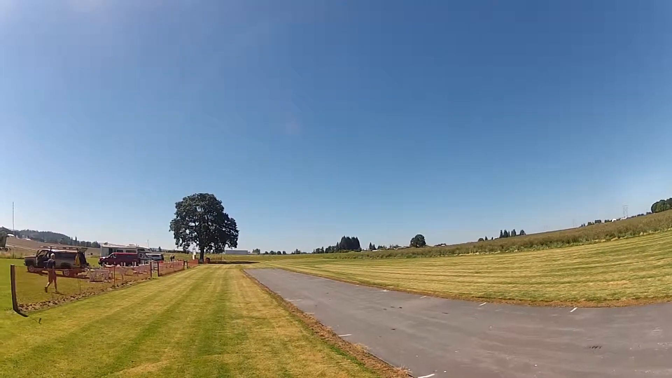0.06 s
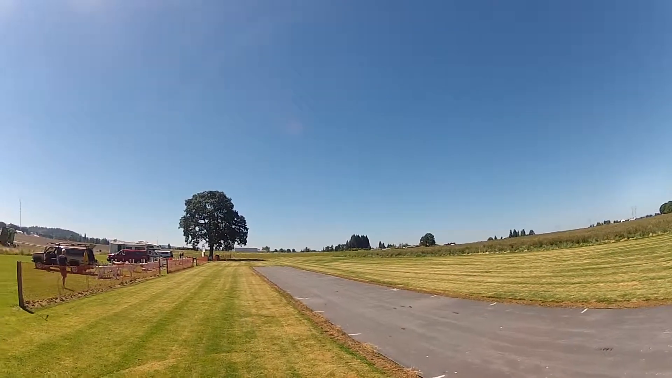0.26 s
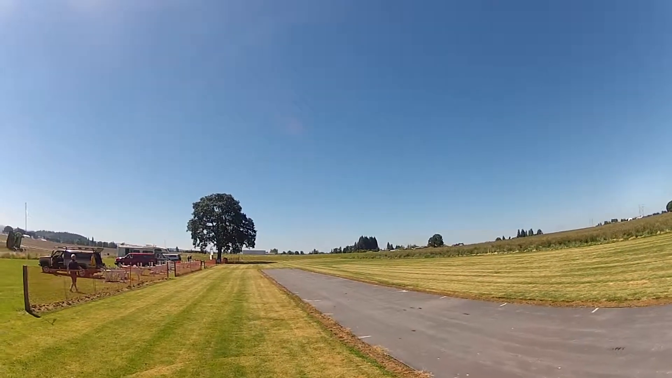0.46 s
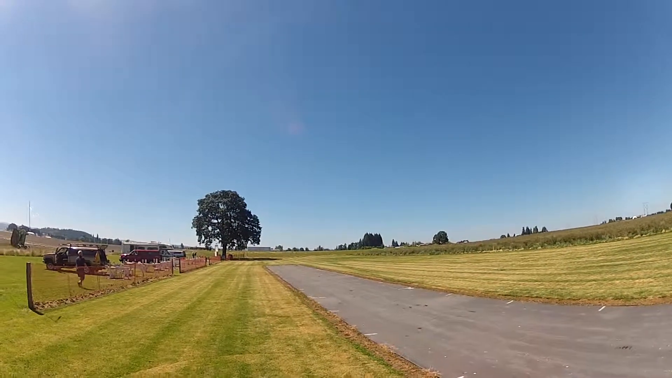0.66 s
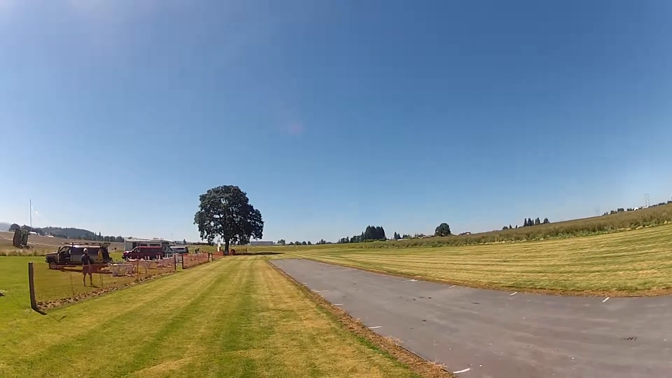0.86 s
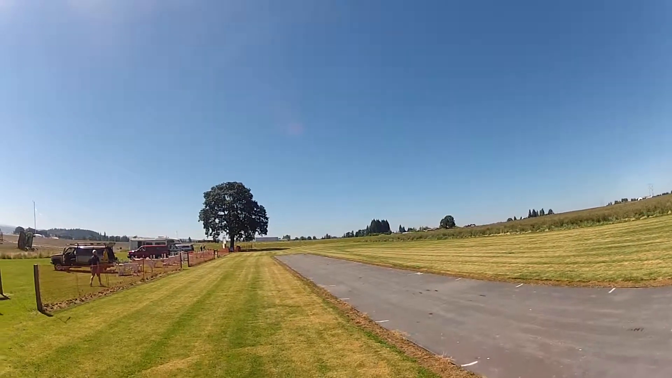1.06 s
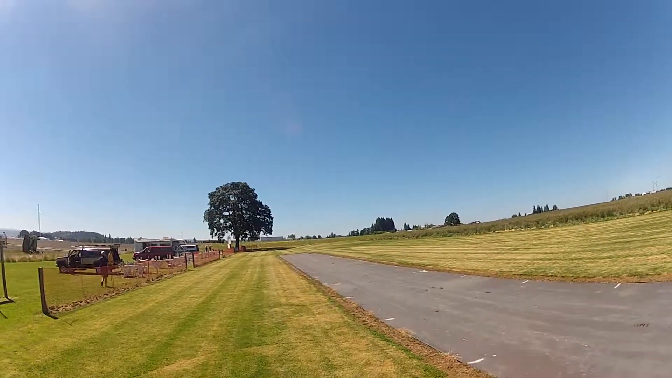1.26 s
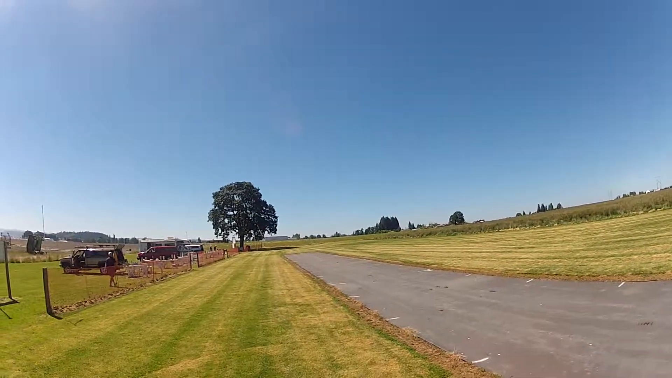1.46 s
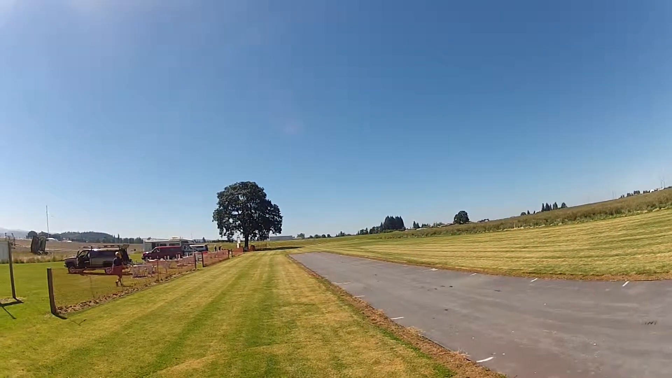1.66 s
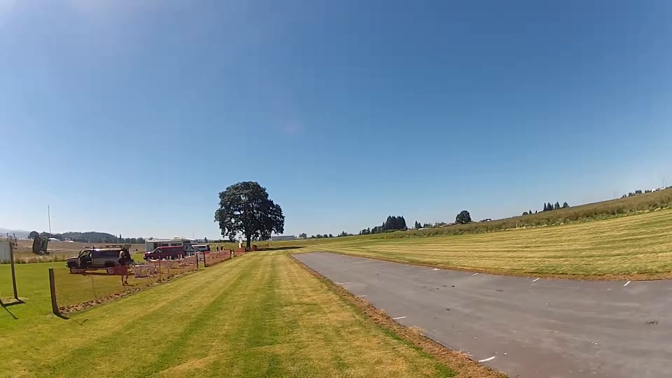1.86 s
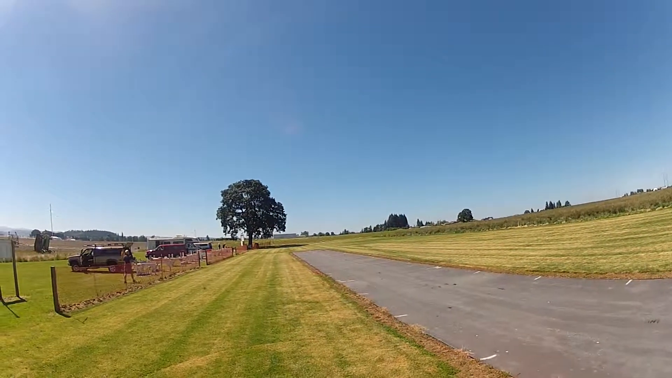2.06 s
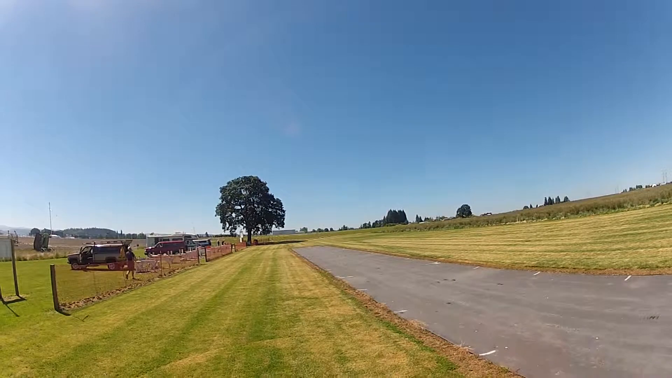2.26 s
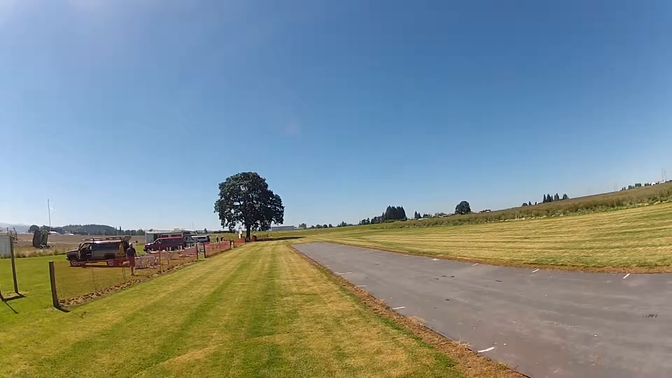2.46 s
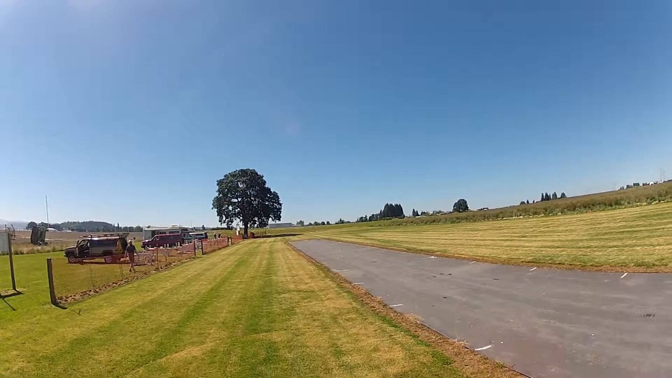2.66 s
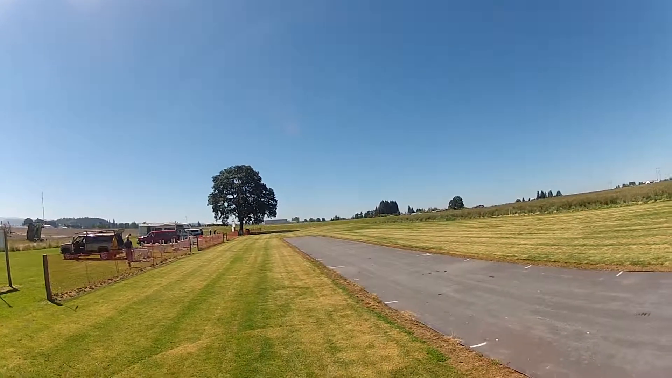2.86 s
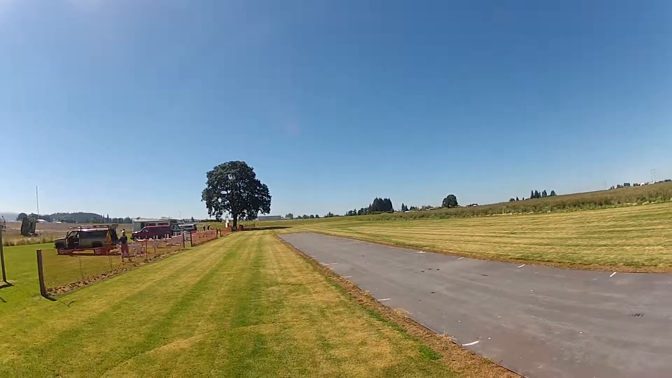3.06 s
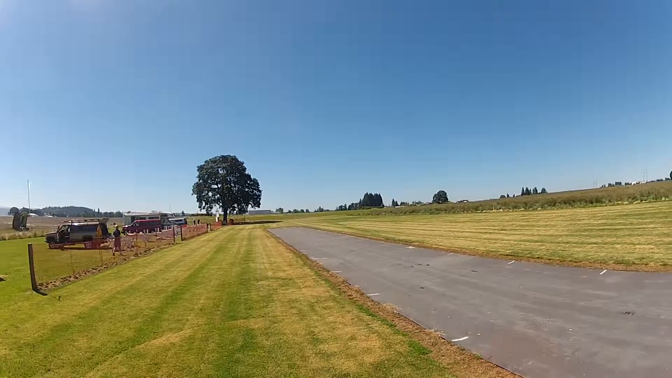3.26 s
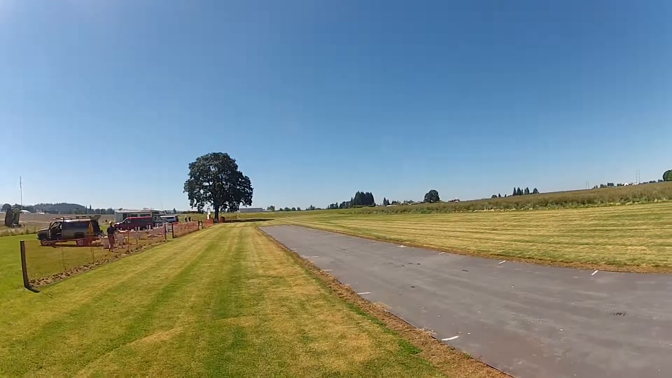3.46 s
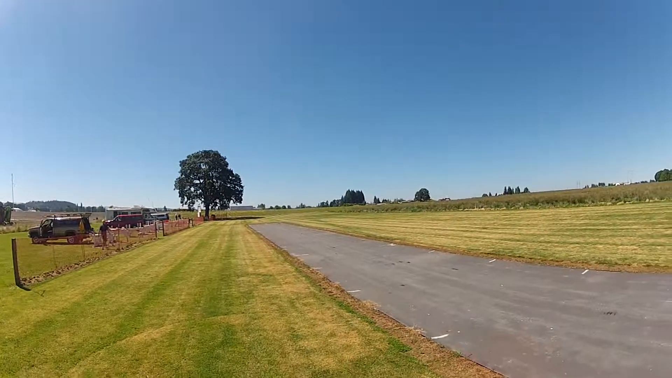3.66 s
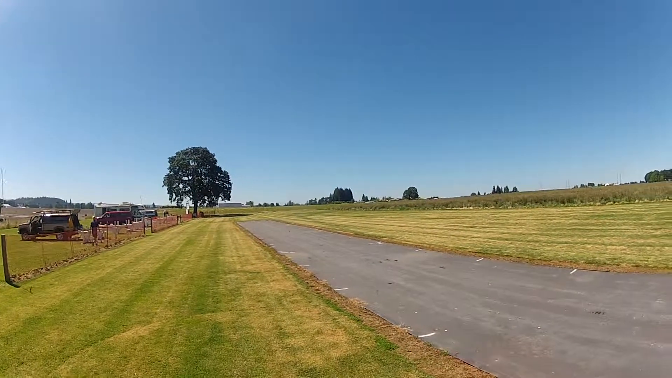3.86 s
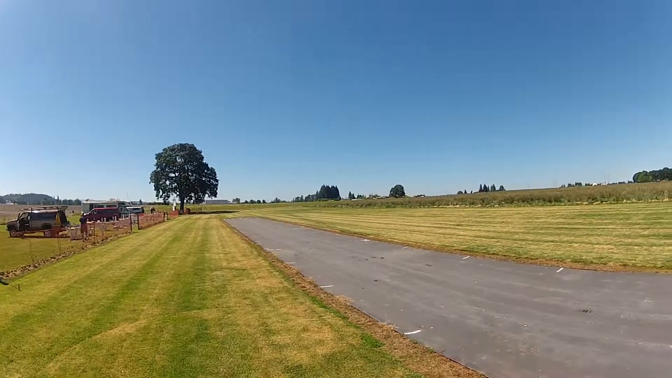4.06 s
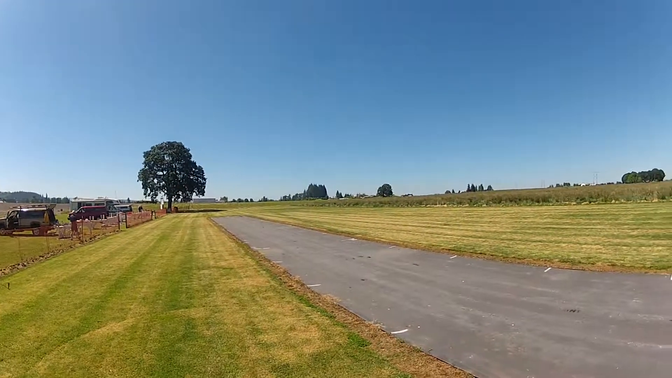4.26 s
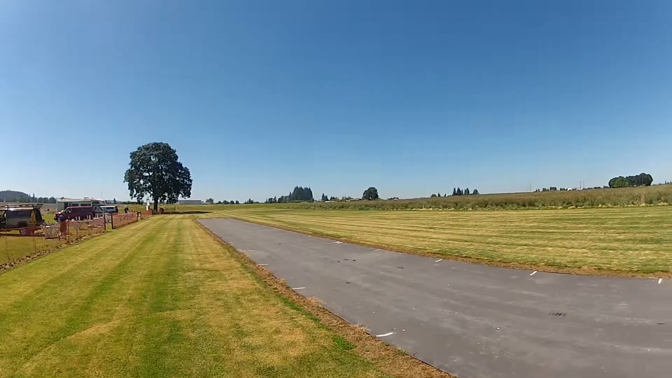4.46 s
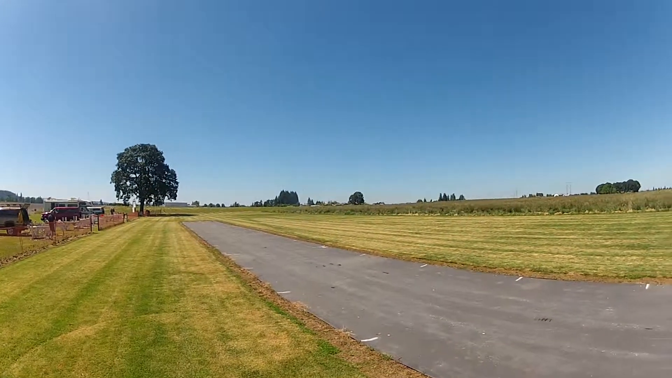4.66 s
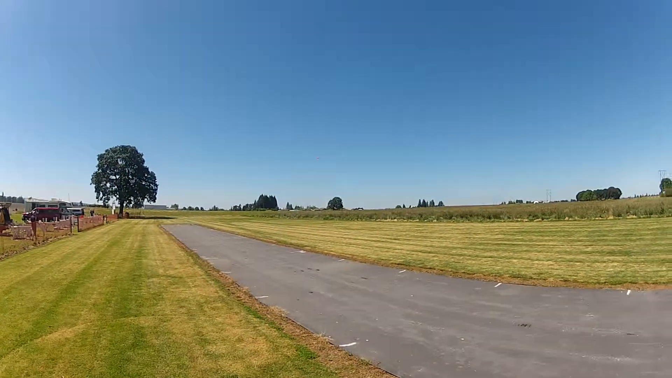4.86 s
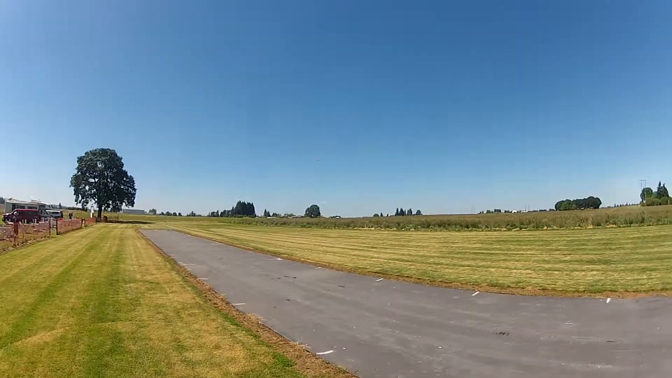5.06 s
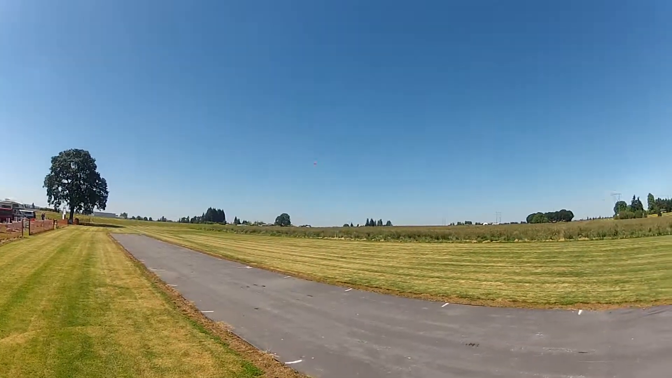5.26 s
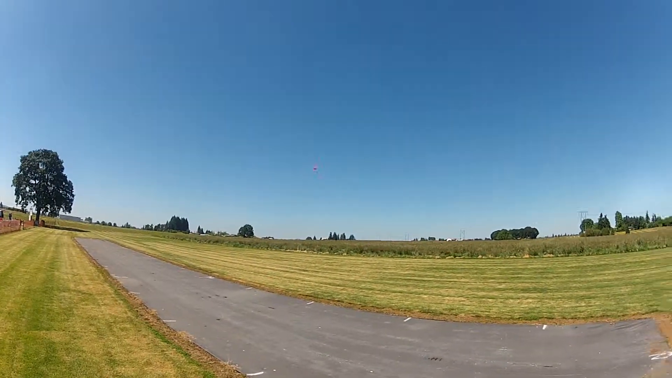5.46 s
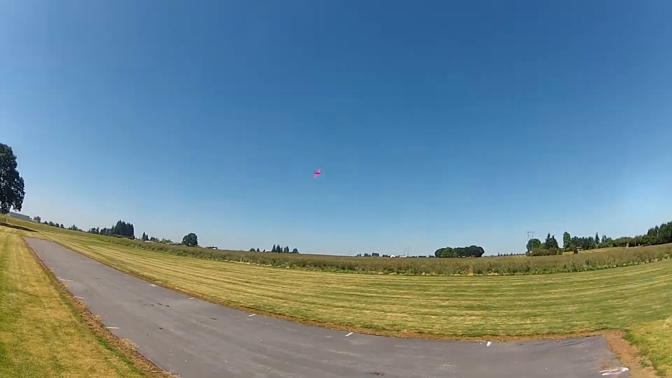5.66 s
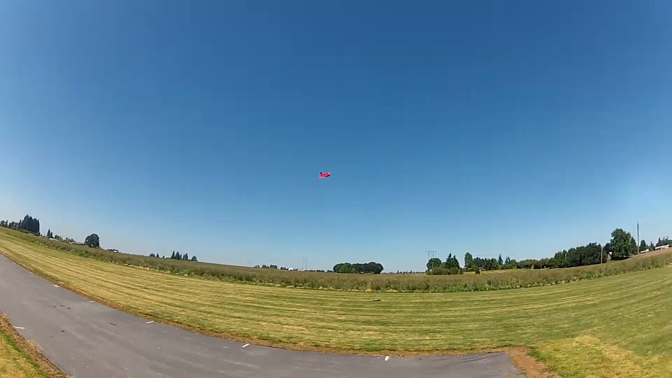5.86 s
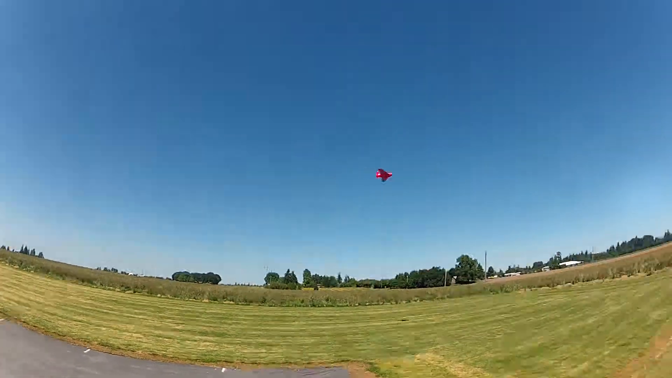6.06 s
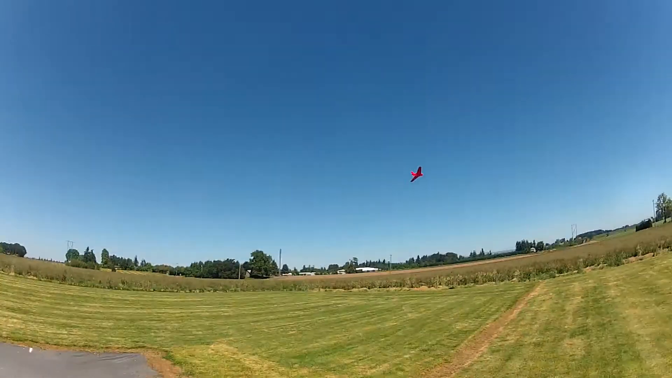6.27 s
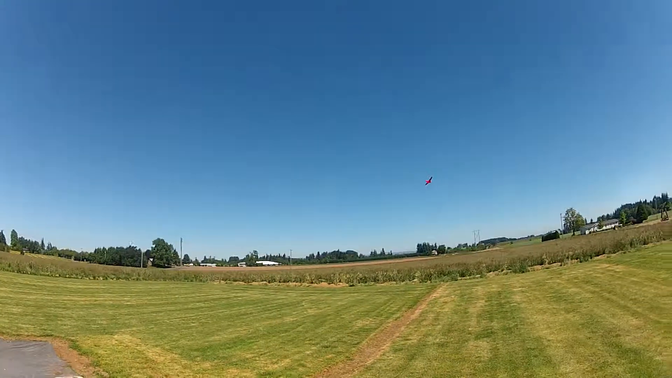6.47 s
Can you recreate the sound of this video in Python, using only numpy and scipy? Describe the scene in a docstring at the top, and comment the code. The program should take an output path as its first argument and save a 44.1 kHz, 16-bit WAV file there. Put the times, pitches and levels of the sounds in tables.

```python
"""Far off over a grass airfield, an electric ducted-fan model jet spools up, its whine fading in and out.
Gusts buffet a small action camera, and a soft double knock sounds close by after about a second.
At full power the jet dives in, the fan whining over shaft hum, rushing air and a low exhaust roar,
while the ground echo sweeps notches through it. Just after six seconds it passes overhead and the
pitch drops. All along, the camera's coarse sampling mirrors the whine into the treble."""
import sys
import numpy as np
from scipy import signal
from scipy.fft import rfft, irfft
from scipy.io import wavfile
from scipy.ndimage import uniform_filter1d

SR = 44100
rng = np.random.default_rng(int(sys.argv[2]) if len(sys.argv) > 2 else 0)


def log_audio(samples):
    """Write samples as a 16-bit WAV file to the path given in sys.argv[1]."""
    # one column per channel
    frames = np.atleast_2d(samples).T
    # limit to full scale, then quantise
    limited = np.clip(frames, -1, 1)
    pcm = np.round(limited * 32767).astype(np.int16)
    wavfile.write(sys.argv[1], SR, pcm)


N = 287532
T = np.arange(N) / SR
SOUND_M_S, JET_M_S = 343, 46.4
MACH = JET_M_S / SOUND_M_S

# Moving air fades the jet in and out, most when it is far off.
# Each row: time in seconds, gain of the whine in dB, gain of the rush in dB.
AIR_FADES = [(.12, -10, -1), (.4, -25, -5.5), (.54, -17, -8), (.61, -5.5, -5.5), (.79, -15, -1.5),
             (.91, 0, 2.5), (.98, -11.5, 0.5), (1.17, -5.5, -4.5), (1.26, -7.5, -2), (1.32, -2, 4),
             (1.39, -23, -2.5), (1.6, -15, 0), (1.67, -3.5, -1), (1.95, -1, -6), (2.27, 1.5, -1.5),
             (2.44, -3, -1), (2.52, 6.5, 3.5), (2.95, 5, 0), (3.1, -1, 0), (3.46, -0.5, -3),
             (3.66, 4.5, 1.5), (3.94, -11, -5), (4.08, -0.5, 0.5), (4.23, 1.5, 2.5), (4.35, 0, 0.5),
             (5.75, 0.5, 0), (6.2, -3.5, -.5), (6.52, 0.5, 0)]


def undb(db):
    """Decibels to gain."""
    return 10 ** (np.asarray(db) / 20)


def curves(table):
    """One envelope for each column after the time, its points joined by straight lines."""
    times, *columns = np.transpose(table)
    return [np.interp(T, times, column) for column in columns]


def noise(colour, peaks=()):
    """Noise of rms 1 with the given spectrum, lifted by resonances."""
    hz, db = np.transpose(colour)
    bin_hz = np.maximum(np.fft.rfftfreq(N, 1 / SR), 1)
    shape_db = np.interp(np.log(bin_hz), np.log(hz), db)
    for centre, width, lift in peaks:
        shape_db += lift / (1 + (2 * (bin_hz - centre) / width) ** 2)
    x = irfft(rfft(rng.standard_normal(N)) * undb(shape_db), N)
    return x / x.std()


def drift(rate):
    """Smooth random modulation of spread 1 that changes about rate times a second."""
    span = max(int(SR / rate), 1)
    x = uniform_filter1d(rng.standard_normal(N), span, mode="wrap")
    x = uniform_filter1d(x, span, mode="wrap")
    return x / x.std()


def field():
    """The bed: the faint, slowly swelling murk of open country."""
    # The murk's dark tone. Each row: frequency in Hz, relative level in dB.
    colour = [(30, -0.5), (300, 6), (420, 3.5), (780, 2), (900, -9.5), (1050, -9.5), (1600, -16.5),
              (3000, -15), (5800, -27)]
    # Its swells. Each row: time in seconds, level in dB.
    swells = [(0, -52), (.08, -57), (1.55, -59), (1.78, -52.5), (2.25, -54.5), (2.7, -60), (3.3, -55.5),
              (4.05, -57), (4.22, -51.5), (4.7, -53.5), (5, -59), (6.52, -77)]
    return noise(colour) * undb(curves(swells)[0] + 0.48 * drift(6.1))


def knocks(contact_s=0.0021):
    """A soft double knock sets something small and hollow ringing near the camera."""
    # The two hits. Each row: start in seconds, gain in dB.
    hits = [(1.189, -44), (1.196, -33.5)]
    # The hollow ring. Each row: frequency in Hz, relative level in dB, seconds to die away by 60 dB.
    modes = [(494, -7, 0.056), (625, 1.5, 0.052), (705, -11, 0.02), (1250, -14, 0.02)]
    out = np.zeros(N)
    for start, db in hits:
        age = np.maximum(T - start, 0)
        ring = sum(np.sin(2 * np.pi * hz * age) * undb(mode_db - 60 * age / t60)
                   for hz, mode_db, t60 in modes)
        out += undb(db) * ring * (1 - np.exp(-age / contact_s))
    return out


def wind(breeze_db=-49.5, attack_s=0.025, release_s=0.032, thump_s=0.015):
    """Gusts over a restless breeze break into eddies at the microphone port; the hardest ones thump."""
    # Gusts on the microphone. Each row: start in seconds, length in seconds, level in dB.
    gusts = [(0, 0.15, -42), (0.273, 0.18, -39), (1.3, 0.099, -45.5), (1.477, .1, -47.5),
             (1.987, 0.067, -44), (2.133, 0.2, -42.5), (2.54, 0.1, -45), (2.99, 0.052, -40),
             (3.146, 0.31, -42.5), (3.577, 0.16, -36.5), (3.795, 0.14, -38), (4.016, 0.077, -37),
             (4.139, 0.19, -39), (4.966, 0.12, -48.5), (5.179, 0.087, -36), (5.321, 0.073, -37.5),
             (5.462, 0.041, -40), (5.95, 0.41, -49)]
    # Single eddies hitting the port. Each row: time in seconds, level in dB.
    thumps = [(0.367, -36), (2.152, -39), (3.248, -33.5), (3.85, -41), (4.032, -33.5), (4.11, -45),
              (5.225, -42), (5.28, -36)]
    # The deep rumble. Each row: frequency in Hz, relative level in dB.
    rumble_colour = [(10, -6), (25, -5), (50, 0), (90, 2), (130, -6), (200, -13), (300, -24), (500, -46.5),
                     (1500, -82)]
    # Thumps reach higher in pitch. Each row: frequency in Hz, relative level in dB.
    thump_colour = [(40, -17), (100, 1.5), (200, -11), (300, -23), (500, -31), (1500, -46), (4000, -56)]
    power = undb(breeze_db + 2.0 * drift(28)) ** 2
    for start, length, db in gusts:
        corners = [start - attack_s, start, start + length, start + length + release_s]
        power += (undb(db) * np.interp(T, corners, [0, 1, 1, 0])) ** 2
    rumble = noise(rumble_colour) * np.sqrt(power) * undb(-0.4 * drift(28))
    thump_envelope = sum(undb(db) * np.exp(-((T - time) / thump_s) ** 2) for time, db in thumps)
    return rumble + noise(thump_colour) * thump_envelope


def flight(closest_s=6.217, closest_m=9.8):
    """The straight pass: metres the arriving sound has travelled, and its cosine off the jet's nose."""
    along = JET_M_S * (T - closest_s) + MACH * closest_m
    squeeze = 1 - MACH ** 2
    distance = (np.sqrt(along ** 2 + squeeze * closest_m ** 2) - MACH * along) / squeeze
    return distance, MACH - along / distance


def over_grass(direct, distance, share, sink_m=0, camera_height_m=1.7, blur_m=235, oversample=4):
    """Natural flanging: the bounce off the grass lags more as the jet stands higher in the sky."""
    # The jet dives, levels out and dips for the pass. Each row: time in seconds, height in metres.
    heights = [(0, 63), (.9, 59), (2.2, 44), (2.7, 35.5), (3.3, 18.5), (3.72, 12.7), (4.05, 10.3),
               (4.27, 9.8), (4.42, 11), (4.83, 11.2), (5.23, 10.45), (5.53, 9.1), (5.76, 7.45),
               (5.98, 5.75), (6.19, 4.8), (6.33, 4.8), (6.52, 5.6)]
    elevation = curves(heights)[0] / distance
    lag_s = (2 * camera_height_m * elevation + sink_m) / SOUND_M_S
    # Grass reflects best at a grazing angle; over a long range the echo blurs away.
    strength = 0.97 * (1 - 2.1 * elevation ** 2) * np.exp(-(distance / blur_m) ** 2)
    fine = signal.resample_poly(direct, oversample, 1)
    echo = np.interp((T - lag_s) * SR * oversample, np.arange(len(fine)), fine)
    return direct + np.clip(share * strength, 0, 1) * echo


def exhaust(ahead, level_db=-21.5, ahead_db=-4):
    """The low roar of the jet mixing with still air, weaker in a narrow cone ahead."""
    # The body of the roar. Each row: frequency in Hz, relative level in dB.
    colour = [(100, -43), (250, -2.5), (380, -6), (520, 0.5), (760, 2), (900, -10), (1050, -13),
              (1800, -10.5), (4000, -29)]
    return noise(colour) * undb(level_db + ahead_db * ahead ** 16 + 0.81 * drift(45))


def airflow(ahead, rush_db=-19.5, rush_ahead_db=6, hiss_db=-30.5, hiss_ahead_db=12):
    """Turbulence rushes in the duct; the intake throws a brighter hiss that fades with the whine."""
    # The broad rush. Each row: frequency in Hz, relative level in dB.
    rush_colour = [(300, -32), (900, -3.5), (1300, -14), (1750, -7.5), (2100, -6), (2600, -1), (3100, -2.5),
                   (3600, -4.5), (4400, -3.5), (5800, -7)]
    # Its hollow resonances. Each row: centre in Hz, width in Hz, boost in dB.
    resonances = [(2074, 144, 11), (2350, 200, 9), (2983, 320, 7.5), (3230, 150, 3.5)]
    # The intake hiss. Each row: frequency in Hz, relative level in dB.
    hiss_colour = [(2500, -18), (3600, -5.5), (4100, 1), (4700, -4.5), (5250, 1), (6000, -14.5)]
    whine_fade_db, rush_fade_db = curves(AIR_FADES)
    rush = noise(rush_colour, resonances) * undb(rush_db + rush_ahead_db * ahead)
    hiss = noise(hiss_colour) * undb(hiss_db + hiss_ahead_db * ahead + 0.43 * whine_fade_db)
    return (rush + hiss) * undb(rush_fade_db + 1.01 * drift(36))


def rotor(facing, full_hz=3732, spool_hz_per_s=296, full_s=2.43, ease_s=0.33, wobble=0.00085):
    """Phase of the blade tone: it climbs, eases into full power and is Doppler-shifted by the pass."""
    source_hz = full_hz - spool_hz_per_s * ease_s * np.logaddexp(0, (full_s - T) / ease_s)
    heard_hz = source_hz / (1 - facing * MACH) * (1 + wobble * drift(45))
    return 2 * np.pi * np.cumsum(heard_hz) / SR


def shaft_hum(blade_phase, blades=5, flutter_db=0.93):
    """The unbalanced shaft hums at one cycle per turn."""
    # The hum swells as the tail turns to the camera. Each row: time in seconds, source level in dB.
    swells = [(.1, -5), (.55, -14.5), (2.25, -13), (2.8, -17), (4.2, -26), (4.7, -18.5), (5.2, -22),
              (6.03, -16), (6.2, -23), (6.29, -5), (6.52, -11)]
    tone = np.sqrt(2) * np.sin(blade_phase / blades) * (1 + 0.026 * drift(82))
    return tone * undb(curves(swells)[0] + flutter_db * drift(31))


def fan_whine(blade_phase, ahead, distance, level_db=-19, ahead_db=11):
    """The lead voice: the tone of the passing blades, beamed forward from the intake."""
    # Eddies roughen the tone, most of all through the wake; a long path makes it flutter.
    roughness = 1 + (0.058 + 0.17 * (1 - ahead)) * drift(190)
    flutter_db = (0.93 + 4.5 * (distance / distance.max()) ** 2) * drift(30)
    tone = np.sqrt(2) * np.sin(blade_phase) * roughness
    return tone * undb(level_db + ahead_db * ahead ** 0.75 + curves(AIR_FADES)[0] + flutter_db)


def scene():
    """The mix: the jet above the grass, louder as it nears, with wind, knocks and the field bed."""
    distance, facing = flight()
    ahead = np.maximum(facing, 0)  # 1 in front of the intake, 0 beside and behind it
    blade_phase = rotor(facing)
    jet = over_grass(fan_whine(blade_phase, ahead, distance), distance, share=0.78)
    # The low hum sinks a little into the turf before it comes back.
    jet += over_grass(shaft_hum(blade_phase), distance, share=0.45, sink_m=0.0067)
    # The rush comes from a spread-out plume, so its notches are shallower than the whine's.
    jet += over_grass(airflow(ahead) + exhaust(ahead), distance, share=0.68)
    return (jet / distance + wind() + knocks() + field())[None]


def record(dry, edge_hz=5450, camera_rate=12000, hold=4, top_hz=15200):
    """The camera samples coarsely and holds each sample, mirroring the sound around its sampling rate."""
    dulled = signal.sosfilt(signal.butter(8, edge_hz, fs=SR, output="sos"), dry)
    coarse = signal.resample_poly(dulled, camera_rate, SR, axis=-1)
    held = np.repeat(coarse, hold, axis=-1)
    mirrored = signal.resample_poly(held, SR, camera_rate * hold, axis=-1)[:, :N]
    return signal.sosfilt(signal.ellip(12, 0.1, 80, top_hz, fs=SR, output="sos"), mirrored)


dry = scene()
out = record(dry)
log_audio(out)
```